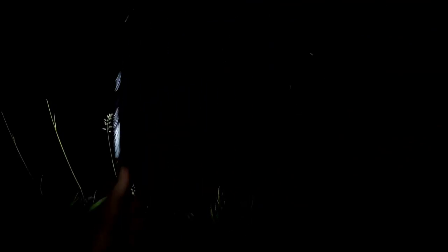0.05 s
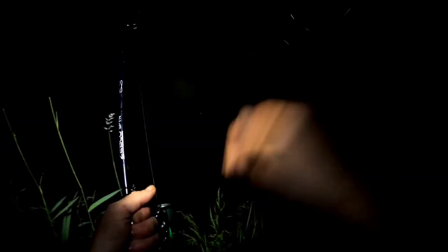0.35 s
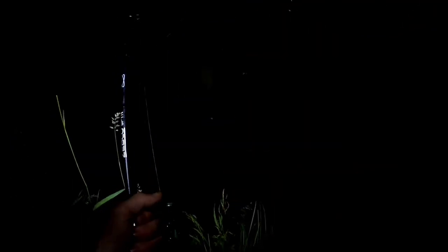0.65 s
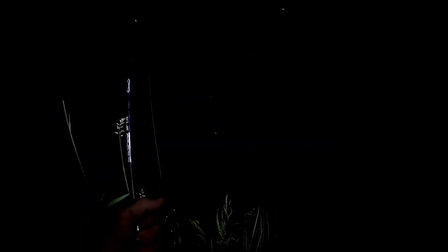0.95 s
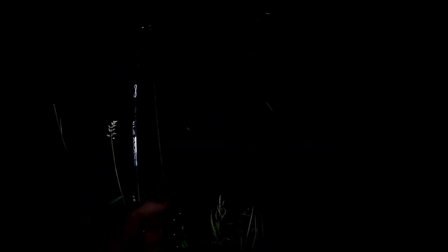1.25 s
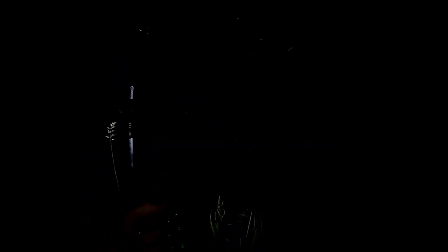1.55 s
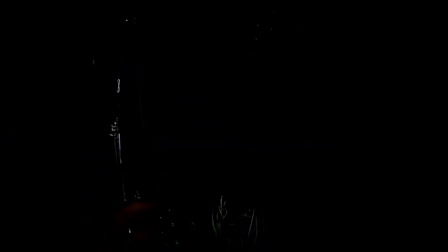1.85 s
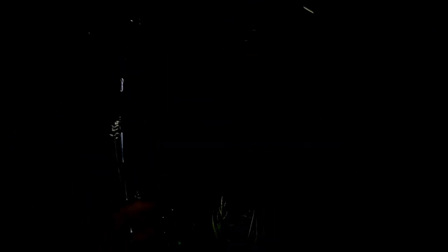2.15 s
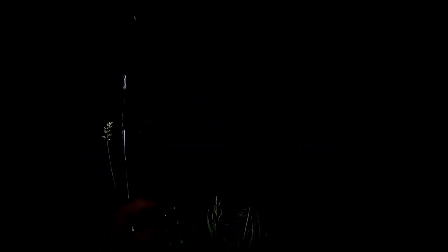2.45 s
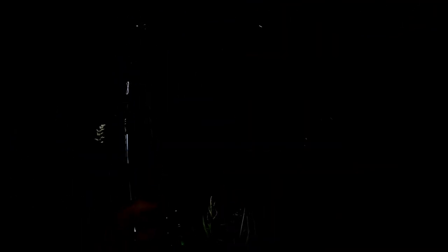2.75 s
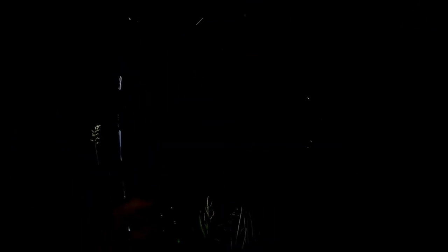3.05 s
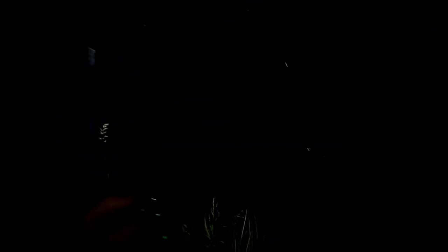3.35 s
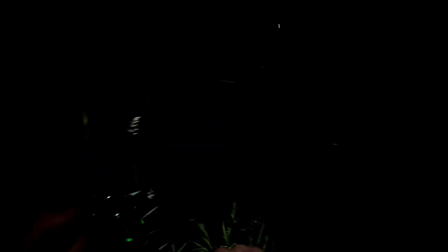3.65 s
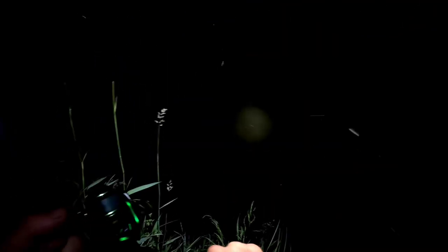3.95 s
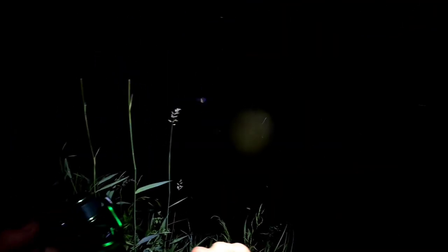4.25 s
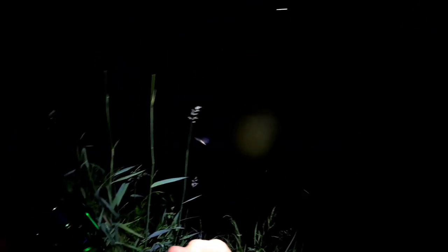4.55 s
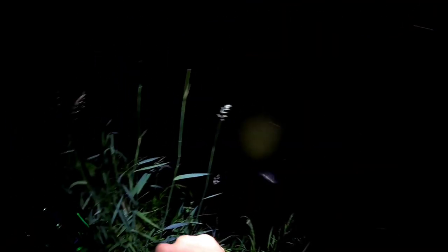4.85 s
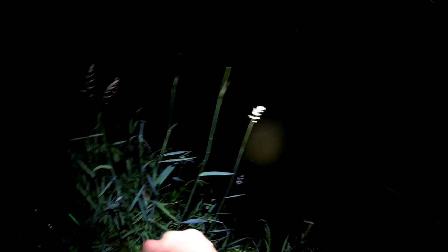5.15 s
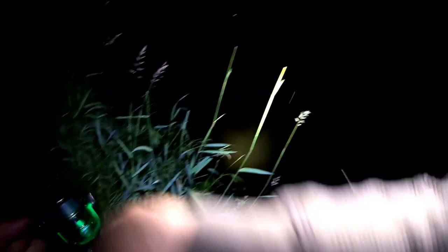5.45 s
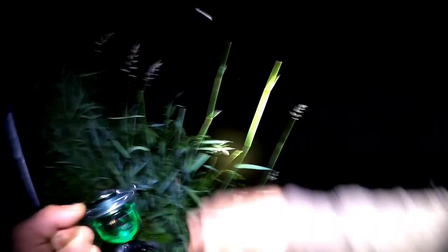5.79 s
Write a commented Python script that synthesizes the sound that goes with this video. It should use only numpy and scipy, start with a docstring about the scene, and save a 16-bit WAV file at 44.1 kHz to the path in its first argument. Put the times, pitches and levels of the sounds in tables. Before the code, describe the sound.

A spinning fishing reel ticks slowly, then its drag slips in uneven bursts of ratcheting clicks over a faint distant engine drone.

```python
"""A fishing reel at night

A spinning reel is worked beside the water. Its spool creeps tooth by tooth and slips in five spells.
A steel clicker spring snaps over each tooth, bounces and rings. The gears and the drag washers (the
spool's brake) grow louder with speed. Line and sleeve hiss faintly; an engine drones far away."""
import sys
import numpy as np
from scipy import signal
from scipy.fft import rfft, irfft, next_fast_len
from scipy.io import wavfile
from scipy.ndimage import uniform_filter1d, map_coordinates

SR = 44100
rng = np.random.default_rng(int(sys.argv[2]) if len(sys.argv) > 2 else 0)


def persist_wave(psi):
    """Save psi, clipped to +-1, as 16-bit WAV."""
    counts = np.round(np.clip(psi, -1, 1) * 32767).astype(np.int16)
    wavfile.write(sys.argv[1], SR, np.atleast_2d(counts).T)


N = 256642

# how alike a noise is on the left and right (1 = the same): pitch_hz, likeness
STEREO_LIKENESS = [(60, 0.91), (150, 0.93), (300, 0.7), (700, .6), (1500, 0.84), (5000, 0.15)]
# the far engine's loudness: time_s, level_db
ENGINE_LEVEL = [(0.0, -37), (1.0, -43), (1.9, -40.5), (2.1, -49), (2.5, -40.5), (2.95, -39.5), (3.2, -47.5),
                (3.7, -40.5), (5.0, -39.5), (5.82, -44.5)]
# the balance of the engine's tones: pitch_hz, idle_db, loaded_db
ENGINE_TONES = [(47.9, -7.5, -13), (58.5, -24.5, -4), (65.5, 4, -18.5), (70.4, 7.5, -2.5),
                (79.5, -4.5, -14), (91.7, -18, -5), (255.3, -34, -30.5), (300.5, -33.5, -24.5)]
# how hard the engine works (0 to 1): time_s, load
ENGINE_LOAD = [(0, 0.62), (2, 0.66), (2.5, 0.9), (5.82, 1)]
# the distant rumble's loudness: time_s, level_db
RUMBLE_LEVEL = [(0, -47), (1.9, -47), (2.3, -45.5), (2.7, -46), (3.3, -48), (4.3, -46), (4.9, -47.5),
                (5.7, -43.5)]
# the rumble's tone: pitch_hz, level_db
RUMBLE_COLOUR = [(15, -22), (30, 1), (50, 1.5), (100, 8), (150, 2.5), (220, -2.5), (300, -5.5), (420, -14),
                 (800, -26.5), (1400, -25.5), (2200, -35), (4000, -44), (7000, -47.5), (10000, -56),
                 (16000, -63)]
# line and sleeve sliding, one list per spell: time_s, level_db
HISS_SPELLS = [
    [(0.0, -65), (0.222, -60), (0.476, -61.5), (0.538, -64), (0.66, -56.5), (0.806, -65), (0.954, -67.5),
     (1.1, -90)],
]
# the tone of that hiss: pitch_hz, level_db
HISS_COLOUR = [(800, 14.5), (1500, 11.5), (3000, 4.5), (5000, 4.5), (8000, 1), (10000, -1.5), (15000, -21)]
# line sliding through a rod ring: middle_s, half_length_s, pitch_hz, level_db
SWISHES = [(.22, .03, 7200, -64), (.82, .025, 8500, -66)]
# slow winding, one list per spell: time_s, level_db
WINDING_SPELLS = [
    [(0.0, -65), (0.116, -71), (0.548, -64), (0.854, -63.5), (1.026, -71), (1.1, -81)],
    [(1.62, -72), (1.75, -65), (1.94, -58.5), (2.0, -78)],
    [(2.25, -68), (2.47, -57.5), (2.6, -58)],
    [(3.25, -60), (3.35, -67), (3.452, -57.5), (3.5, -55)],
    [(4.05, -52), (4.15, -58.5), (4.744, -64.5), (5.248, -67), (5.418, -69), (5.5, -65)],
]
# the bearings' tone: pitch_hz, level_db
BEARING_COLOUR = [(300, -19), (900, -15), (1200, 0), (1550, -0.5), (1900, -7.5), (2400, -14), (4000, -19),
                  (7000, -26), (10000, -42), (16000, -64.5)]
# the spool creeps by one tooth: start_s, snap_db, depth_db, bright_db, low_ring_db, high_ring_db
CREEP_TICKS = [(0.1367, -38.5, 0, -1, -49, -58), (0.2975, -37.5, -0.5, -5, -52, -53),
               (0.334, -33, -2, 1, -51, -50.5), (0.3757, -32, -4.5, 2, -60, -45),
               (0.4195, -31, -5, -8, -60, -45.5), (0.4719, -30, -8.5, -14.5, -53, -41.5),
               (0.5365, -31.5, -14.5, -0.5, -50, -42.5), (0.6018, -35, -3.5, 10, -53, -44),
               (0.6668, -40, 6, 0.5, -53, -45), (0.8806, -36, -1, 3.5, -45.5, -49.5),
               (1.3008, -35.5, -3.5, -0.5, -55, -52), (1.49, -36, -4, -4, -52.5, -53),
               (2.074, -37.5, 2, 0, -47.5, -47.5), (2.544, -34.5, 3, 10, -52.5, -50),
               (3.3126, -29, -7, 0, -53.5, -43.5), (3.381, -29, -16, 3, -49, -41),
               (3.4517, -33.5, -4.5, 3, -52, -42.5), (4.1301, -27.5, -1.5, 3, -49.5, -39),
               (4.2427, -31.5, -2, 5.5, -47, -40), (4.3724, -35, -2.5, -12, -57, -42),
               (4.6125, -35, 2, 2.5, -51, -38), (4.8123, -35, 1, 1, -42, -53.5),
               (5.015, -33, 1, -3.5, -49, -48.5), (5.1124, -30, -5, 0, -46, -50),
               (5.3387, -35.5, -3.5, -7, -42.5, -41.5)]
# the reel body's notes (wider ones die sooner): pitch_hz, width_hz, level_db
BODY_NOTES = [(1378, 162, -22), (1610, 180, -31.5), (3020, 670, -9.5), (4150, 680, -5.5), (5740, 750, -0.5),
              (7100, 1130, 2), (8560, 810, -7), (10100, 1400, -10), (11980, 244, -14), (14460, 1200, -15.5)]
# the spring's notes, each fading 60 dB in its ring time: pitch_hz, level_db, ring_s
SPRING_NOTES = [(4826, 0, .175), (5960, -13, .11), (7245, 0, .12), (10800, -18, .09), (11505, -12, .08),
                (12355, -2, .04), (12495, -14, .08), (13200, -24, .08)]
# slack in the handle: start_s, level_db
HANDLE_KNOCKS = [(0.4398, -40), (0.6972, -35), (3.3757, -36), (5.083, -40.5), (5.361, -46)]
# the drag gives way, one list per slip: time_s, clicks_per_s
SLIPS = [
    [(1.686, 17.2), (1.783, 44.3), (1.849, 49.0), (1.933, 21.3)],
    [(2.25, 15.1), (2.299, 26.9), (2.381, 36.9), (2.474, 13.9)],
    [(2.595, 31.7), (2.691, 77.8), (2.742, 79.5), (2.777, 62.6), (2.905, 65.1), (2.92, 75.6), (2.949, 51.6),
     (3.143, 58.0), (3.226, 27.0), (3.264, 25.5)],
    [(3.503, 21.6), (3.604, 56.3), (3.639, 46.9), (3.654, 25.7), (3.75, 31.3), (3.777, 44.7), (3.821, 61.8),
     (3.844, 143.6), (3.902, 100.5), (3.927, 161.3), (3.954, 88.0), (3.977, 85.5), (4.042, 31.2),
     (4.071, 25.9)],
    [(5.468, 20.6), (5.511, 56.0), (5.564, 83.7), (5.599, 70.1), (5.651, 111.1), (5.71, 56.2),
     (5.744, 74.8), (5.82, 54.0)],
]
# a slipping tooth at the usual speed: snap_db, depth_db, bright_db, low_ring_db, high_ring_db
TOOTH_DB = (-31, 1, 1.5, -46, -46)
# what those five levels gain each time the speed doubles
TOOTH_DB_PER_DOUBLING = (1.2, 1.1, 0.3, 4.3, 2.5)
# how much those five levels vary from tooth to tooth
TOOTH_SCATTER_DB = (1.35, 4.3, 3.8, 4.5, 3.5)
# a harder pull on the line makes harder snaps: time_s, gain_db
LINE_PULL = [(1.71, -2), (1.765, -4), (1.865, -0.5), (1.93, -1.5), (2.25, -0.5), (2.33, 1), (2.41, -2),
             (2.62, 0), (2.76, -1.5), (3.02, -1.5), (3.17, -0.5), (3.5, 1.5), (3.57, 3.5), (3.65, 1),
             (3.76, 5.5), (3.84, 1.5), (3.97, 2.5), (4.07, 2.5), (5.47, -6), (5.495, 2), (5.55, 0.5),
             (5.61, 5), (5.66, -2), (5.8, 2.5)]
# how firmly the gears press together: time_s, gain_db
GEAR_LOAD = [(1.8, -2.5), (2.35, -1.5), (2.8, -2.5), (3.08, 3.5), (3.25, -5), (3.6, 1.5), (3.8, 5),
             (4.0, 10.5), (4.07, -1), (5.5, -13), (5.67, -9.5), (5.72, 4), (5.82, 12)]
# the gear housing's tone: pitch_hz, level_db
HOUSING_COLOUR = [(300, -39), (700, -30), (1000, -15), (1200, 7.5), (1400, -1.5), (1650, -3), (1950, -4.5),
                  (2300, -16.5), (3000, -20), (6000, -54)]
# the rod's tone: pitch_hz, level_db
ROD_COLOUR = [(250, -30), (450, 1), (600, -2), (740, -2), (900, -20), (1200, -39), (3000, -78)]
# how much the rod joins in as the grip changes: time_s, gain_db
ROD_GRIP = [(1.8, -12.5), (2.4, -2), (2.74, -0.5), (2.95, -3.5), (3.15, -4.5), (3.6, -10), (3.85, -17.5),
            (4.0, -19.5), (5.6, -7), (5.82, -14)]
# the drag washers' tone: pitch_hz, level_db
WASHER_COLOUR = [(600, -19), (1500, -18.5), (3000, 2), (6000, -1.5), (9000, -0.5), (10500, -5.5),
                 (12300, -2.5), (13200, -19.5), (15000, -29), (16000, -34)]
# how hard the washers bite: time_s, gain_db
WASHER_BITE = [(1.82, -0.5), (2.35, -2.5), (2.7, -1), (3.1, 0.5), (3.6, 1), (3.95, 2.5), (5.55, 1.5),
               (5.8, 0.5)]
# where the reel is heard: time_s, left_over_right_db
REEL_PAN = [(0, -0.5), (2.8, -1), (3.4, -0.5), (3.8, 1), (5.82, 2.5)]
# how long echoes from bank and grass take to fade 60 dB: pitch_hz, fade_s
BANK_FADE = [(300, 0.088), (3000, 0.082), (12000, 0.019)]

USUAL_CLICKS_PER_S, GEAR_TEETH_PER_CLICK = 50, 9
TIME_S = np.arange(N) / SR


def amp(db):
    """Turn decibels into a gain."""
    return 10 ** (np.asarray(db) / 20)


def unit(x):
    """Scale a sound to an average (rms) level of 1."""
    return x / np.sqrt(np.mean(x ** 2) + 1e-20)


def along(points, hz):
    """Read a (pitch_hz, value) table on a log scale of pitch."""
    pitches, values = np.transpose(points)
    return np.interp(np.log(hz + 1), np.log(pitches + 1), values)


def curve(rows):
    """Read a (time_s, value) table at every sample."""
    return np.interp(TIME_S, *np.transpose(rows))


def spells(tables):
    """A gain that follows each spell's levels and fades to silence between spells."""
    gain = 0
    for rows in tables:
        active = 1. * (TIME_S >= rows[0][0]) * (TIME_S <= rows[-1][0])
        gain += amp(curve(rows)) * uniform_filter1d(active, size=1500)
    return gain


def wobble(per_s):
    """A smooth curve through per_s random values a second."""
    return map_coordinates(rng.standard_normal(int(N * per_s / SR) + 4), [TIME_S * per_s])


def filtered(x, response):
    """Scale each frequency in x by response(hz)."""
    size = next_fast_len(N + SR // 4)
    return irfft(rfft(x, size) * response(np.fft.rfftfreq(size, 1 / SR)), size)[..., :N]


def noise(colour):
    """Stereo noise with the given tone, nearly the same on both sides in the bass."""
    def response(hz):
        angle = np.arccos(np.clip(along(STEREO_LIKENESS, hz), -1, 1)) / 2
        return amp(along(colour, hz)) * [np.cos(angle), np.sin(angle)]
    mid, side = filtered(rng.standard_normal((2, N)), response)
    return unit(np.array([mid + side, mid - side]))


def add(track, start_s, sound):
    """Mix a sound into a stereo track."""
    start = max(round(start_s * SR), 0)
    part = track[:, start:start + sound.shape[1]]
    part += sound[:, :part.shape[1]]


def far_engine(gain_db, drift_rad, throb_db, steadying):
    """An engine's low tones waver and throb, growing steadier as it works harder."""
    load = np.clip(curve(ENGINE_LOAD), 0, 1)
    drone = 0
    for hz, idle_db, loaded_db in ENGINE_TONES:
        level = amp(idle_db + load * (loaded_db - idle_db) + 3.2 * wobble(5))
        phase = 2 * np.pi * hz * TIME_S + drift_rad * wobble(4) + rng.uniform(0, 2 * np.pi)
        drone += level * np.sin(phase)
    drone /= np.sqrt(np.abs(uniform_filter1d(drone ** 2, size=10000)) + .001)  # even out the level
    throb = throb_db * (1 - steadying * load) * wobble(11)
    return amp(curve(ENGINE_LEVEL) + gain_db + throb) * drone


def night_rumble(gain_db):
    """A low, distant rumble gently rises and falls."""
    return amp(curve(RUMBLE_LEVEL) + gain_db) * noise(RUMBLE_COLOUR)


def line_hiss():
    """Line and sleeve slide softly, and the line swishes twice through a rod ring."""
    hiss = amp(1.8 * wobble(20)) * spells(HISS_SPELLS) * noise(HISS_COLOUR)
    for middle_s, half_length_s, hz, db in SWISHES:
        swell = np.exp(-((TIME_S - middle_s) / half_length_s) ** 2 / 2)
        band = [(hz / 2, -40), (hz * .85, -12), (hz, 0), (hz * 1.15, -14), (hz * 1.5, -40)]
        hiss += amp(db) * swell * noise(band)
    return hiss


def winding(gain_db):
    """The slowly turned rotor purrs in its bearings."""
    return amp(gain_db + 1.22 * wobble(36)) * spells(WINDING_SPELLS) * noise(BEARING_COLOUR)


def snaps(clicks, gain_db, scatter_db, bounce_s, rebound, spread_rad):
    """The spring lands on each tooth and bounces twice, jolting the reel's body into a brief ring."""
    out, t = np.zeros((2, N)), np.arange(SR // 80) / SR
    hz, width_hz, note_db = np.transpose(BODY_NOTES)[:, :, None]
    for start_s, snap_db, depth_db, bright_db, _, _ in clicks:
        tone_db = note_db + (hz < 4600) * np.minimum(depth_db, 3) + (hz > 9500) * bright_db
        pitch_hz = hz * (1 + 0.031 * rng.standard_normal(hz.shape))
        side_phase = spread_rad * rng.standard_normal((2, len(hz), 1))  # differs left and right
        gap_s = bounce_s * np.exp(0.2334 * rng.standard_normal())
        snap = 0
        for landing in range(3):
            age = np.maximum(t - gap_s * landing ** 0.921, 0)
            strength = rebound ** landing * amp(tone_db + scatter_db * rng.standard_normal(hz.shape))
            envelope = np.exp(-np.pi * width_hz * age) * (1 - np.exp(-age / 0.00021))
            phase = 2 * np.pi * pitch_hz * age + side_phase + rng.uniform(0, 2 * np.pi, hz.shape)
            snap += np.sum(strength * envelope * np.sin(phase), axis=1)
        add(out, start_s, amp(snap_db + gain_db) * unit(snap[:, :SR // 340]))  # about 3 ms long
    return out


def spring_ring(clicks, low_gain_db, high_gain_db, scatter_db, choke_s, spread_rad):
    """The freed spring rings until the next tooth stops it and sets it ringing afresh."""
    out, t = np.zeros((2, N)), np.arange(SR // 5) / SR
    hz, note_db, ring_s = np.transpose(SPRING_NOTES)[:, :, None]
    gaps_s = np.diff(clicks[:, 0], append=N / SR + 1)
    weak = note_db < note_db.max() - 6  # the weak notes come and go from tooth to tooth
    phase = rng.uniform(0, 2 * np.pi, hz.shape)
    for (start_s, _, _, _, low_db, high_db), free_s in zip(clicks, gaps_s):
        age = t[t < free_s + 0.01]
        db = note_db + np.where(hz == hz[0], low_db + low_gain_db, high_db + high_gain_db)
        db += scatter_db * weak * rng.standard_normal(hz.shape)
        phase += 1.6 * rng.standard_normal(hz.shape)  # each tooth nudges the vibration
        side_phase = phase + spread_rad * rng.standard_normal((2, len(hz), 1))
        waves = np.sin(2 * np.pi * hz * (round(start_s * SR) / SR + age) + side_phase)
        ring = np.sum(amp(db - 60 * age / ring_s) * waves, axis=0 + 1)
        attack = 1 - np.exp(-age / 0.00024)
        choke = np.exp(-np.maximum(age - free_s, 0) / choke_s)
        add(out, start_s, ring * attack * choke)
    return out


def handle_knocks(gain_db, fade_s):
    """Slack in the handle is taken up with small dull ticks."""
    envelope, t = np.zeros((2, N)), np.arange(SR // 20) / SR
    for start_s, db in HANDLE_KNOCKS:
        add(envelope, start_s, amp(db + gain_db - 60 * t / fade_s)[None])
    colour = [(700, -24), (1400, 1), (2500, -11.5), (6000, -7), (10000, -16.5), (16000, -37.5)]
    return envelope * noise(colour)


def slip_clicks(slip):
    """One click for each passing tooth, harder with speed and pull; rows as in CREEP_TICKS."""
    time_s, speed = np.transpose(slip)
    t = np.arange(time_s[0], time_s[-1], 1 / SR)
    teeth_passed = np.cumsum(np.interp(t, time_s, speed)) / SR
    starts_s = np.interp(np.arange(round(teeth_passed[-1]) + 1), teeth_passed, t)
    doublings = np.log2(np.interp(starts_s, time_s, speed) / USUAL_CLICKS_PER_S)
    db = TOOTH_DB + np.outer(doublings, TOOTH_DB_PER_DOUBLING)
    db += TOOTH_SCATTER_DB * rng.standard_normal(db.shape)
    db[:, 0] += np.interp(starts_s, *np.transpose(LINE_PULL))
    return np.c_[starts_s, db]


def spool_speed():
    """The spool's smoothed speed in clicks a second, zero between slips."""
    speed = sum(np.interp(TIME_S, *np.transpose(slip), left=0, right=0) for slip in SLIPS)
    return np.abs(uniform_filter1d(speed, size=1000))


def gears(speed, gain_db, overtone_db, rod_db):
    """Gear teeth sing through housing and rod, rising clear of the bearings' grind with speed."""
    shudder = 1 + .03 * wobble(45) + .025 * wobble(300)  # the spool turns jerkily
    phase = 2 * np.pi * np.cumsum(GEAR_TEETH_PER_CLICK * speed * shudder) / SR
    teeth = sum(amp(4.5 * wobble(70) + overtone_db * (k - 1)) * np.sin(k * phase) for k in (1, 2, 3))
    whine = unit(filtered(teeth, lambda hz: amp(along(HOUSING_COLOUR, hz))))
    whine /= np.sqrt(np.abs(uniform_filter1d(whine ** 2, size=2500)) + .01)  # even out the level
    grip = amp(curve(ROD_GRIP))
    whine += grip * filtered(teeth, lambda hz: amp(along(ROD_COLOUR, hz)))
    grind = noise(BEARING_COLOUR) + amp(rod_db) * grip * noise(ROD_COLOUR)
    whine_share = np.clip((speed - 35) / 70, 0, .88)
    whirr = np.sqrt(whine_share) * whine + np.sqrt(1 - whine_share) * grind
    level = amp(gain_db + curve(GEAR_LOAD)) * (speed / USUAL_CLICKS_PER_S) ** 0.97
    return level * whirr * amp([[1.6], [-1.6]])  # louder on the left


def drag_washers(speed, gain_db):
    """The washers rub and catch in tiny grains, louder as the spool spins faster."""
    rub = unit(noise(WASHER_COLOUR) * amp(4 * wobble(900)))
    return amp(gain_db + curve(WASHER_BITE)) * (speed / USUAL_CLICKS_PER_S) ** 0.9 * rub


def place_reel(reel, lead_s, shade_db):
    """The reel reaches the left side a little earlier, and its high notes favour the right."""
    side = np.array([[0.5], [-0.5]])
    def response(hz):
        shade = along([(2000, -0.15), (4500, 0.93), (12000, 1)], hz)
        return np.exp(2j * np.pi * hz * lead_s * side) * amp(side * shade_db * shade)
    return filtered(reel * amp(curve(REEL_PAN) * side), response)


def bank_echo(reel):
    """Hands, ground and grass scatter the sound into a short blur of echoes."""
    hz, t, spectrum = signal.stft(rng.standard_normal((2, SR // 6)), SR, nperseg=128)
    fade = amp(-60 * t / along(BANK_FADE, hz)[:, None])
    tail = signal.istft(spectrum * fade, SR, nperseg=128)[1]
    tail = unit(tail) / np.sqrt(tail.shape[1])
    delayed = np.pad(tail, ((0, 0), (SR // 400, 0)))  # 2.5 ms late
    return signal.fftconvolve(reel, delayed, axes=1)[:, :N]


def scene():
    """The reel close by, with the night behind it."""
    clicks = np.vstack([CREEP_TICKS] + [slip_clicks(slip) for slip in SLIPS])
    clicks = clicks[np.argsort(clicks[:, 0])]
    speed = spool_speed()
    reel = snaps(clicks, gain_db=-0.05, scatter_db=3, bounce_s=0.000704, rebound=0.5, spread_rad=0.47)
    reel += spring_ring(clicks, low_gain_db=3, high_gain_db=3.5, scatter_db=5.5,
                        choke_s=.0015, spread_rad=0.41)
    reel += gears(speed, gain_db=-51, overtone_db=1, rod_db=-5.5)
    reel += drag_washers(speed, gain_db=-50)
    reel += winding(gain_db=-1.5)
    reel += handle_knocks(gain_db=-4, fade_s=0.019)
    reel = place_reel(reel, lead_s=.000012, shade_db=-1.5)
    nearby = reel + amp(-14) * bank_echo(reel) + line_hiss()
    engine = far_engine(gain_db=-1, drift_rad=0.5, throb_db=5, steadying=0.83)
    return nearby + engine + night_rumble(gain_db=0.54)


def record(dry):
    """Cut off everything above 16000 Hz."""
    return filtered(dry, lambda hz: hz < 16000)


dry = scene()
out = record(dry)
persist_wave(out)
```